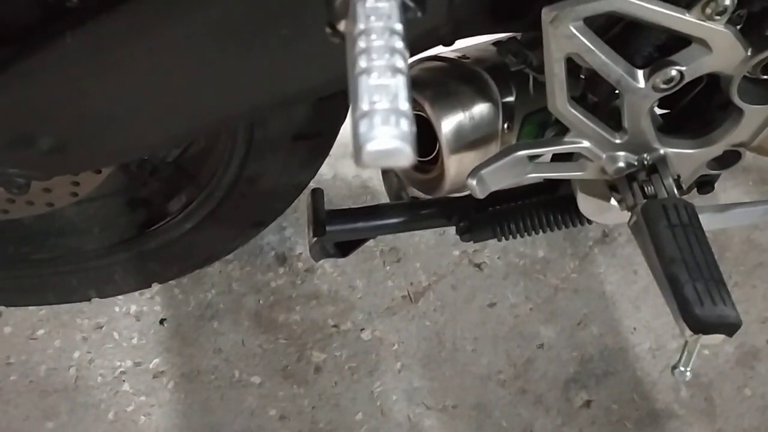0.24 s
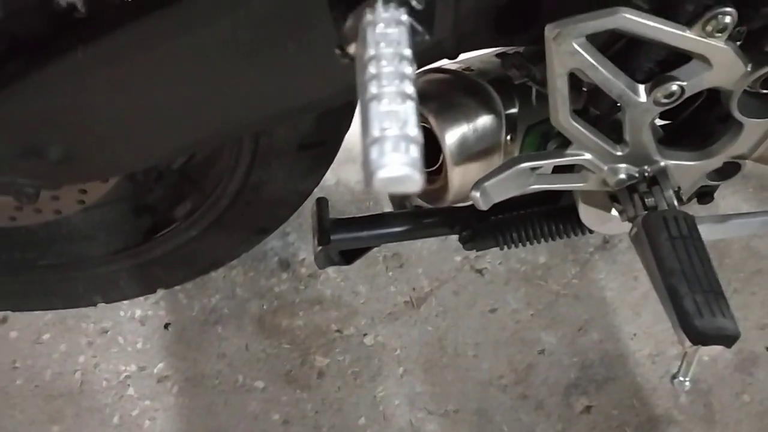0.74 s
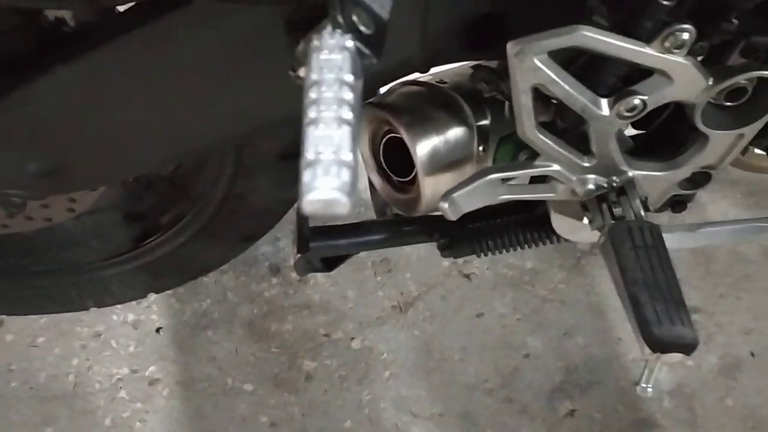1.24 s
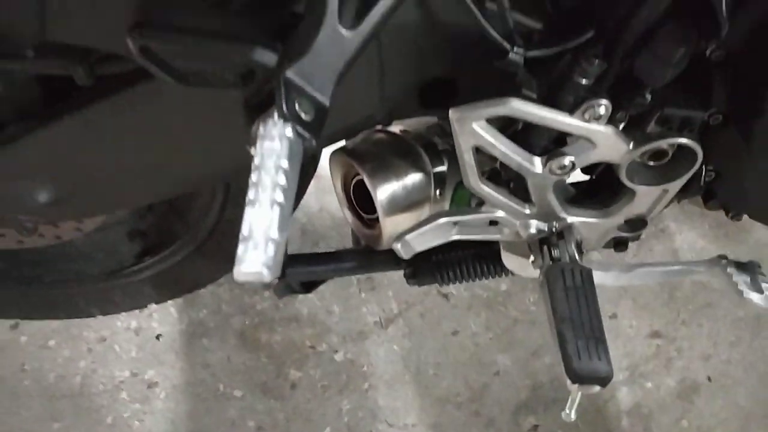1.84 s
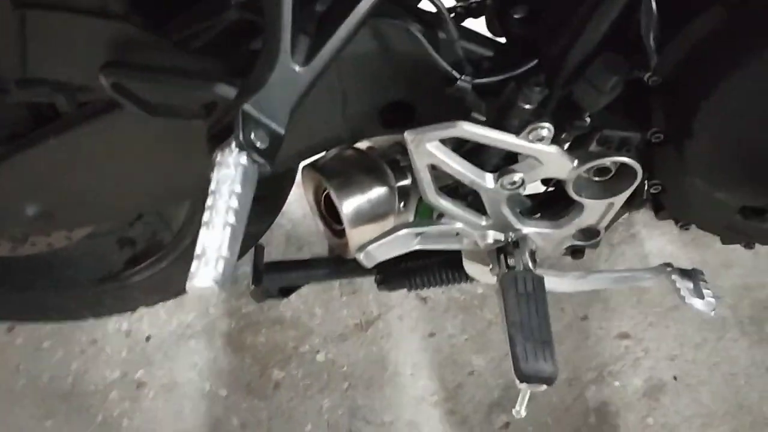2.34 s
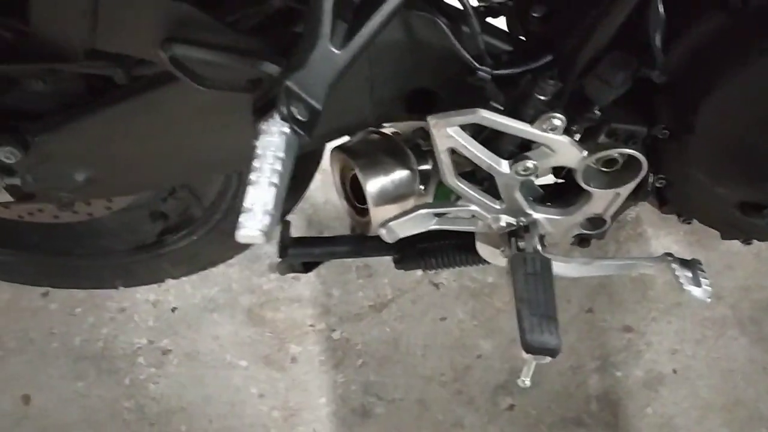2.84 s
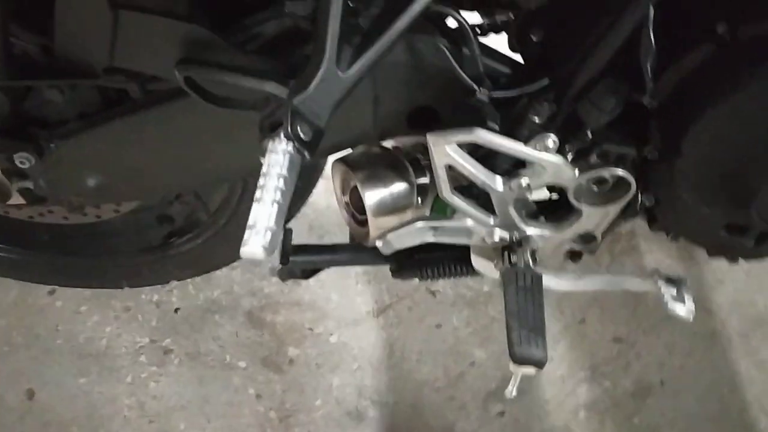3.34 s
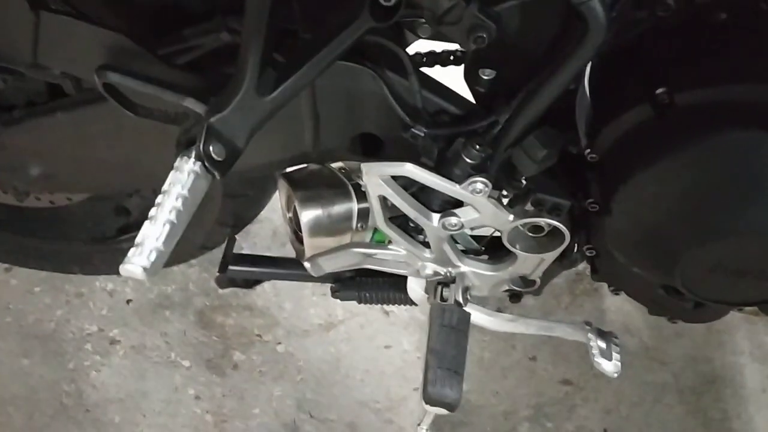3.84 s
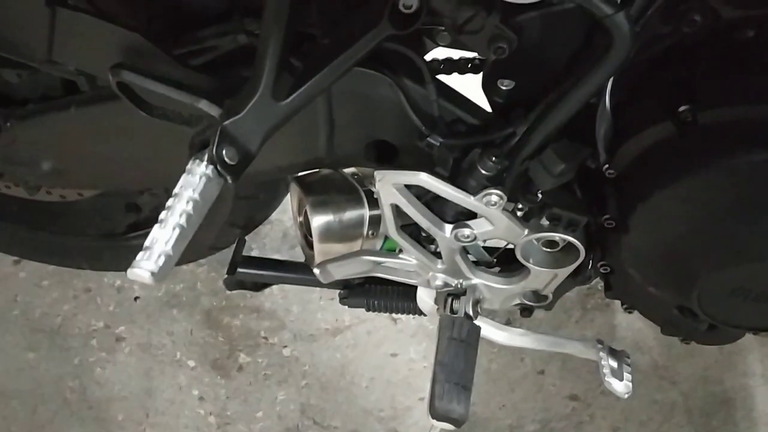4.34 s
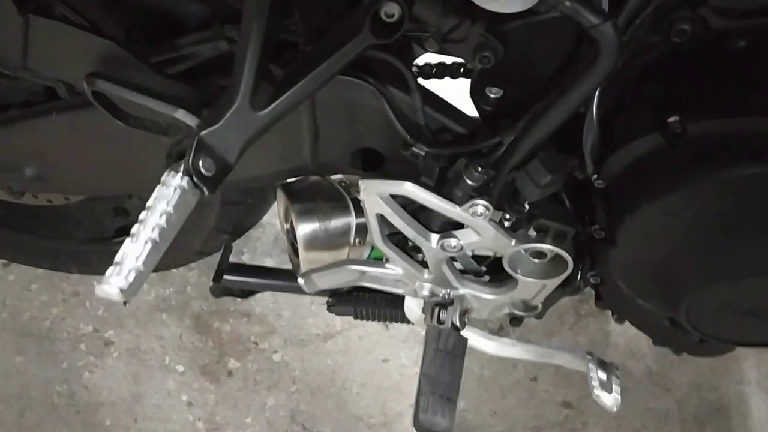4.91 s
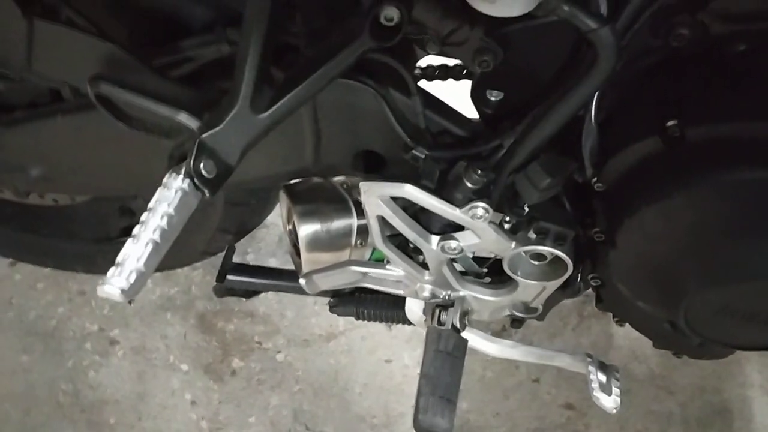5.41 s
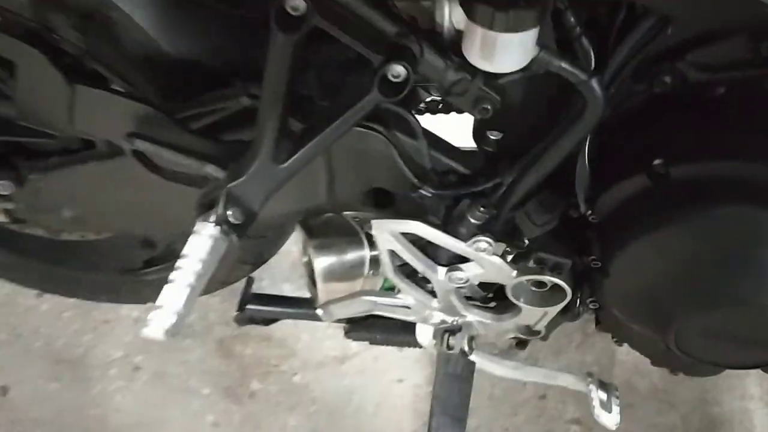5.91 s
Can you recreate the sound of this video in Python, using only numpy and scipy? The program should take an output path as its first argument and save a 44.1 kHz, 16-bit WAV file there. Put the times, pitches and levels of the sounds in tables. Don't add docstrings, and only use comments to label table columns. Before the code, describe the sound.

A three-cylinder motorcycle crackles down from a rev, blips once more, settles to a lumpy popping idle and is switched off in a concrete garage.

```python
import sys
import numpy as np
from scipy import signal
from scipy.fft import rfft, irfft, next_fast_len
from scipy.io import wavfile
from scipy.ndimage import uniform_filter1d, map_coordinates

SR = 44100
rng = np.random.default_rng(int(sys.argv[2]) if len(sys.argv) > 2 else 0)


def magnitude_from_level(level_db):
    exponent = np.asarray(level_db, float) / 20
    return 10 ** exponent


def transcribe(signal):
    frames = np.atleast_2d(signal).T
    limited = np.clip(frames, -1, 1)
    pcm = np.round(limited * 32767).astype(np.int16)
    wavfile.write(sys.argv[1], SR, pcm)


N = 272097
T = np.arange(N) / SR
STOP = 5.47

# (time [s], speed [firings per s])
SPEED = [(0.0, 92.27), (0.3, 65.08), (0.42, 49.71), (0.55, 104.27), (0.65, 92.82), (1.26, 34.18),
         (1.34, 29.67), (1.45, 27.48), (1.72, 31.28), (1.92, 28.83), (2.3, 28.69), (2.47, 30.7),
         (2.85, 28.69), (3.17, 30.37), (3.41, 28.72), (4.91, 30.14), (5.16, 28.43), (5.47, 9.54)]
# (time [s], peak [dB], thud [dB], fizz [dB])
AFTERFIRE = [(0.081, -3, -3, -12), (0.202, -5, -8, -18), (0.233, -9, -9, 3), (0.325, -23, 3, -14),
             (0.739, -7.5, -20, -4), (0.794, -4, -4, -12), (0.88, -4.5, -3, -7), (0.995, -9, -5, -20),
             (1.197, -11.5, 8.5, -11), (1.28, -16, -20, 7), (5.459, -13.5, -12, -9)]
# (frequency [Hz], level [dB per Hz])
RASP = [(210, -1), (350, -5.5), (500, -10), (754, -10.5), (815, -9), (1160, -10), (1820, -9), (2350, -13.5),
        (2830, -13.5), (3200, -16.5), (5000, -19), (6500, -34.5), (11000, -120)]
# (frequency [Hz], level [dB per Hz])
FIZZ = [(2060, -35), (3500, -32), (3810, -5), (4120, -11.5), (4990, -3), (6230, -1), (9040, 7.5),
        (10900, 2), (13300, -14.5), (14700, -60)]
# (at idle [dB], added on overrun [dB], added when pulling [dB], without ignition [dB per s])
RASP_DB = (-23.5, 2.5, -2.5, -40)


def unit(x):
    return x / np.sqrt(np.mean(x ** 2) + 1e-20)


def along(points, hz):
    f, v = np.transpose(points)
    return np.interp(np.log(hz + 1), np.log(f + 1), v)


def curves(rows, t=T):
    s, *cols = np.transpose(rows)
    return [np.interp(t, s, c) for c in cols]


def filtered(x, response):
    m = next_fast_len(N + SR // 2)
    return irfft(rfft(x, m) * response(np.fft.rfftfreq(m, 1 / SR)), m)[..., :N]


def impulses(times, sizes):
    index = np.round(np.asarray(times) * SR).astype(int)
    return np.bincount(np.clip(index, 0, N - 1), sizes, N)


def bump(hz, width):
    return np.exp(-2 * (np.pi * hz * width) ** 2)


def resonance(hz, centre, width):
    return 1j * hz * width / (centre * centre - hz * hz + 1j * hz * width)


def wobble(rate):
    coarse = T[::64]
    knots = rng.standard_normal(int(N * rate / SR) + 4)
    return np.interp(T, coarse, map_coordinates(knots, [coarse * rate]))


def spread(pair):
    # (frequency [Hz], likeness [0-1])
    likeness = [(200, 0.98), (500, 0.81), (1000, 0.51), (2000, 0.27), (10000, 0.2)]
    turn = lambda hz: np.arccos(np.clip(along(likeness, hz), 0, 1)) / 2
    mid, side = filtered(pair, lambda hz: np.array([np.cos(turn(hz)), np.sin(turn(hz))]))
    return np.array([mid + side, mid - side])


def noise(spectrum, gate):
    gated = spread(gate * rng.standard_normal((2, N)))
    return unit(filtered(gated, lambda hz: magnitude_from_level(along(spectrum, hz))))


def turns():
    first_turn = 0.15
    return first_turn + np.cumsum(curves(SPEED)[0] * (T < STOP + 0.02)) / SR


def firings():
    angle = turns()
    return np.interp(np.arange(1, int(angle[-1]) + 1), angle, T)


def state(t):
    # (time [s], share [0-1])
    even_firing = [
        (.44, 0.4),
        (.54, 0.9),
        (.71, 0.94),
        (.76, 0.22),
    ]
    idle_rate, above_idle, ignition_off = 30.5, 12, 5.2
    rate, = curves(SPEED, t)
    overrun = np.clip((rate - idle_rate) / above_idle, 0, 1)
    pull = np.clip(curves(even_firing, t)[0], 0, 1)
    return rate, overrun, pull, np.maximum(t - ignition_off, 0)


def silencer():
    t = T[:SR // 6]
    swell = t / 0.0132 * np.exp(1 - t / 0.0132)
    upper = 0.28 * swell * np.cos(2 * np.pi * 148 * (t - 0.0197))
    lower = 0.59 * magnitude_from_level(-60 * t / 0.093) * np.sin(2 * np.pi * 120.6 * t)
    return upper + lower


def tailpipe(hz):
    # (from behind [s], from the side [s])
    pop_widths = (0.00076, 0.00096)
    # (frequency [Hz], width [Hz], level [dB])
    end_can = [(215, 85, -0.5), (320.5, 30, -5.5)]
    can = 1 + sum(magnitude_from_level(db) * resonance(hz, centre, width) for centre, width, db in end_can)
    floor = 1 + 0.28 * np.exp(-2j * np.pi * hz * 0.00531)
    less_bass = 85 * 1j * hz / (85 + 1j * hz)
    return bump(hz, np.array(pop_widths)[:, None]) * less_bass * can * floor


def pumping():
    orders = [2, -5, -2, -3.5, -8.5, -8.5, -12.5, -14]
    # (frequency [Hz], level [dB])
    pipe_colour = [(40, -24), (65, -24), (105, -22.5), (150, -16.5), (190, -13.5), (270, -27.5), (400, -22),
                   (800, -25)]
    last = round(1.5 * SR)
    rate, overrun, pull, _ = state(T[:last])
    angle = 2 * np.pi * turns()[:last]
    base_db = 1.5 * pull - 28 * (1 - overrun) ** 2
    total = np.zeros(last)
    for k, db in enumerate(orders, 1):
        flutter_db = 1.6 * (1.5 - pull) * wobble(13.85)[:last]
        total += magnitude_from_level(base_db + db + along(pipe_colour, k * rate) + flutter_db) * np.cos(k * angle)
    return np.pad(total * (overrun > 0), (0, N - last))


def exhaust(fire):
    cylinders = [0, 0.42, 0.93]
    # (time [s], boom change [dB], pop change [dB])
    misfires = [(1.253, -7, -9), (1.281, 1, -12), (1.412, 3, -18), (1.82, 3.5, -3), (2.541, 2.5, -6.5),
                (2.775, 0, -1.5), (4.143, 0, 2), (4.178, 1.5, -15), (4.513, -13.5, -27), (4.95, 2.5, -8),
                (5.156, 0, -12), (5.39, -10, -6), (5.47, -7, -5)]
    # (time [s], share of side view [0-1])
    turn_away = [(1.602, 0.1), (4.5, .8)]
    rate, overrun, pull, off = state(fire)
    rev = np.maximum(rate - 30.5, 0) / (104 - 30.5)
    boom_db = 3.6 - 11.5 * rev - 15 * pull + 0.73 * (fire - 3.2) - 46 * off
    pop_db = 1.0 - 12 * overrun - 7 * pull - 25 * (1 - np.exp(-off / 0.04))
    for s, boom_change_db, pop_change_db in misfires:
        nearest = np.argmin(abs(fire - s))
        boom_db[nearest] += boom_change_db
        pop_db[nearest] += pop_change_db

    scatter_db = 1.3 + (2.5 - 1.3) * overrun + (0.6 - 2.5) * pull
    luck = rng.standard_normal((len(fire), 3)) * scatter_db[:, None]
    cylinder_db = np.resize(cylinders, len(fire))
    when = fire + 0.00025 * luck[:, 0]
    booms = impulses(when, magnitude_from_level(boom_db + cylinder_db + 0.6 * luck[:, 1]))
    pops = impulses(when, magnitude_from_level(pop_db + cylinder_db + 1.3 * luck[:, 2]))
    s, peak_db, thud_db, _ = np.transpose(AFTERFIRE)
    thuds = impulses(s, magnitude_from_level(peak_db + thud_db + 4.5))

    side = np.clip(curves(turn_away)[0], 0, 1)
    cracks = filtered((pops + thuds) * np.array([1 - side, side]), tailpipe).sum(axis=0)
    return signal.fftconvolve(booms, silencer())[:N] + cracks + pumping()


def flow_db(rule, column):
    # (time [s], rasp change [dB], fizz change [dB])
    gusts = [(.3, -5, -0.5), (.4, -3, -1.5), (.425, 6.5, 2.5), (.58, -8.5, -1), (.875, 1, 2),
             (1.19, -3.5, -7), (1.26, -4.5, 3), (1.98, -2, -4), (4.52, -2, -5), (5.239, 3.5, 7.5),
             (5.33, 7.5, 4), (5.39, -4, -8)]
    _, overrun, pull, off = state(T)
    gust_s = 0.011
    surge_db = sum(g[column] * np.exp(-((T - g[0]) / gust_s) ** 2 / 2) for g in gusts)
    steady_db = rule[0] + rule[1] * overrun + rule[2] * pull + rule[3] * off
    return steady_db + surge_db + 0.48 * wobble(4.987)


def puffs(fire, width, depth, scatter_db):
    sizes = magnitude_from_level(scatter_db * rng.standard_normal(len(fire)))
    burst = filtered(impulses(fire + 0.0026, sizes), lambda hz: bump(hz, width))
    steady = magnitude_from_level(-150 * state(T)[3])
    return (steady + depth * np.abs(burst) * width * SR * 2.6) * (T < STOP)


def gas(fire):
    # (at idle [dB], added on overrun [dB], added when pulling [dB], without ignition [dB per s])
    fizz_db = (-30.5, 7, -4.5, -25)
    rasp = noise(RASP, puffs(fire, width=0.0032, depth=0.7, scatter_db=2.2))
    fizz = noise(FIZZ, puffs(fire, width=0.0026, depth=1.65, scatter_db=2.6))
    return magnitude_from_level(flow_db(RASP_DB, column=1)) * rasp + magnitude_from_level(flow_db(fizz_db, column=2)) * fizz


def valves(fire, per_firing=6):
    # (frequency [Hz], width [Hz], level [dB])
    case_rings = [(824, 52, -2.5), (1580, 324, 6), (1873, 155, 6), (2760, 220, 1.5), (9010, 1100, -2)]
    taps = rng.random((len(fire) - 1, per_firing, 3))
    times = (fire[:-1, None] + taps[..., 0] * np.diff(fire)[:, None]).ravel()
    size = magnitude_from_level(-14 * taps[..., 1:].reshape(-1, 2)) * [1, -1]
    hits = np.array([impulses(times, size[:, 0]), impulses(times + 0.00062, size[:, 1])])

    def cases(hz):
        return sum((-1) ** k * magnitude_from_level(db) * resonance(hz, centre, width)
                   for k, (centre, width, db) in enumerate(case_rings))

    clatter = unit(spread(filtered(hits, cases)))
    return magnitude_from_level(flow_db(RASP_DB, column=1) - 6.5) * (T < STOP) * clatter


def afterfire():
    s, db, _, fizz_db = np.transpose(AFTERFIRE)
    dying = magnitude_from_level(-60 * T[:SR // 10] / 0.037)
    burst = lambda level_db: signal.fftconvolve(impulses(s, magnitude_from_level(level_db)), dying)[:N]
    return burst(db - 5.0) * noise(RASP, 1) + burst(db + fizz_db - 7.5) * noise(FIZZ, 1)


def intake(fire):
    # (time [s], roar level [dB])
    throttle = [
        (.4, -50),
        (.44, -22.5),
        (.49, -22),
        (.55, -27),
        (.59, -47),
    ]
    # (frequency [Hz], level [dB per Hz])
    airbox = [(300, -11), (500, -1), (900, -4.5), (1300, 1.5), (1800, -21), (3000, -42)]
    roar = noise(airbox, puffs(fire, width=0.00091, depth=2.7, scatter_db=2.5))
    return magnitude_from_level(curves(throttle)[0]) * (T < throttle[-1][0]) * roar


def squeaks():
    # (time [s], level [dB], first pitch [Hz], last pitch [Hz], length [s])
    chirps = [
        (1.089, -33.5, 3200, 2720, .09),
        (1.15, -27, 2660, 2530, .04),
        (1.176, -36, 2500, 2390, .03),
        (1.23, -31, 2400, 2320, 0.037),
        (1.322, -32.5, 2580, 2670, 0.048),
        (1.423, -33, 2650, 2575, 0.037),
        (1.521, -31.5, 2650, 2640, .03),
        (5.151, -34, 2800, 2776, 0.048),
        (5.231, -28, 10700, 10700, .025),
        (5.452, -38, 10700, 10760, 0.015),
    ]
    out = np.zeros((2, N + SR))
    for s, db, first_hz, last_hz, length in chirps:
        count = round(length * SR)
        waver = uniform_filter1d(rng.normal(0, 570, SR // 8), 90)[:count]
        hz = np.linspace(first_hz, last_hz, count) + waver
        tone = np.sin(2 * np.pi * np.cumsum(hz) / SR + rng.random((2, 1)))
        start = round((s - length / 2) * SR)
        out[:, start:start + count] += magnitude_from_level(db + 4.5) * np.hanning(count) * tone
    return out[:, :N]


def ticks():
    # (time [s], peak [dB], pitch [Hz], time to fade by 60 dB [s], left-right [dB])
    metal = [
        (1.2795, -25, 1630, 0.017, -3.0),
        (5.4096, -34, 740, 0.018, 14),
        (5.4609, -27.5, 1200, 0.0064, -9),
        (5.642, -44, 2140, 0.016, -6),
        (5.7568, -50, 10400, 0.02, 1),
        (5.8466, -54, 9160, 0.02, -8),
        (5.9344, -48.5, 810, 0.016, 1),
    ]
    out, t = np.zeros((2, N + SR)), T[:SR // 8]
    for s, db, hz, t60, pan_db in metal:
        ring = magnitude_from_level(-60 * t / t60) * np.sin(2 * np.pi * hz * t)
        crack = 0.63 * magnitude_from_level(-60 * t / 0.019) * rng.standard_normal((2, len(t)))
        sides_db = np.array([[pan_db], [-pan_db]]) / 2
        start = round(s * SR)
        out[:, start:start + len(t)] += magnitude_from_level(db + 9 + sides_db) * (ring + crack)
    return out[:, :N]


def rocking():
    # (time [s], push level [dB])
    pushes = [
        (5.335, -11),
        (5.405, -24.5),
        (5.44, -15),
        (5.463, -17),
    ]
    s, db = np.transpose(pushes)
    return filtered(impulses(s, magnitude_from_level(db)), lambda hz: 450 * bump(hz, 0.0032))


def garage(x):
    # (frequency [Hz], time to fade by 60 dB [s])
    fade_times = [(60, 0.91), (200, 0.45), (600, 0.85), (1500, 0.8), (4000, 0.54), (12000, 0.33)]
    hz, t, z = signal.stft(rng.standard_normal((2, SR * 3 // 4)), SR, nperseg=256)
    fading = z * magnitude_from_level(-60 * t / along(fade_times, hz)[:, None])
    tail = signal.istft(fading, SR, nperseg=256)[1]
    tail = spread(np.pad(tail, ((0, 0), (400, N)))[:, :N])[:, :SR]
    return signal.fftconvolve(x, tail / np.linalg.norm(tail[0]), axes=1)[:, :N]


def scene():
    # (frequency [Hz], left over right [dB])
    lean = [(60, -0.5), (110, -1.5), (200, 2), (370, 0), (680, 0.5), (1250, -5.5), (2300, 3.5), (4230, 2.5),
            (7760, -3.5), (14300, 10)]
    # (frequency [Hz], level [dB per Hz])
    quiet_air = [(15, -35), (25, -4.5), (54, 8.5), (315, -9.5), (1940, -12.5), (2970, -19), (4310, -18.5),
                 (5480, -20.5), (8860, -10), (12500, -21), (14700, -21.5)]
    fire = firings()
    pipe = (exhaust(fire) + rocking()) * np.ones((2, 1))
    rest = gas(fire) + valves(fire) + afterfire() + intake(fire) + squeaks() + ticks()
    near = pipe + rest + garage(magnitude_from_level(-19) * pipe + magnitude_from_level(-4.5) * rest)
    leaning = filtered(near, lambda hz: magnitude_from_level(np.outer([0.5, -0.5], along(lean, hz))))
    return leaning + magnitude_from_level(-50.5) * noise(quiet_air, 1)


def low_pass(x):
    return signal.sosfilt(signal.butter(12, 14860, fs=SR, output="sos"), x)


def record(dry):
    x = filtered(dry, lambda hz: (1j * hz / (38 + 1j * hz)) ** 2)
    x = x / (1 + np.abs(x) ** 8) ** (1 / 8)
    return low_pass(x)


dry = scene()
out = record(dry)
transcribe(out)
```